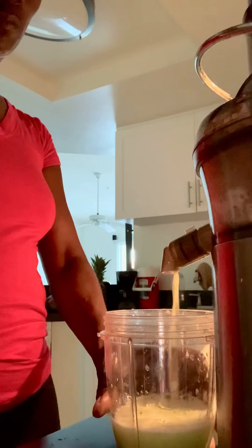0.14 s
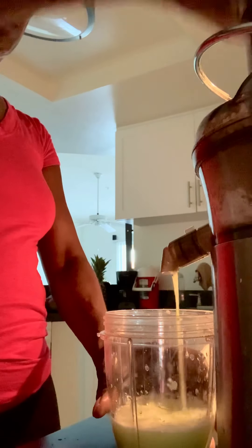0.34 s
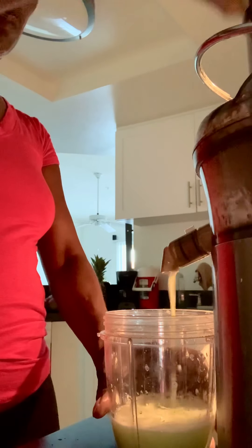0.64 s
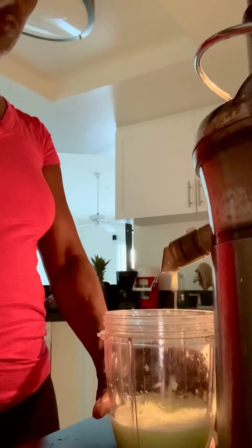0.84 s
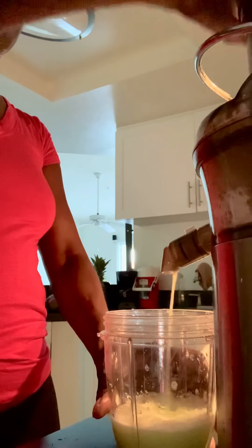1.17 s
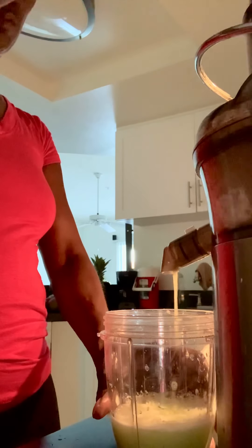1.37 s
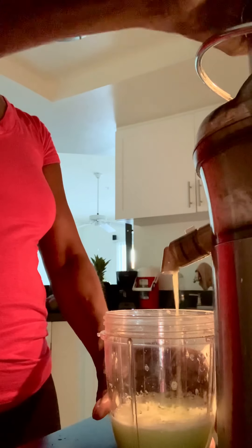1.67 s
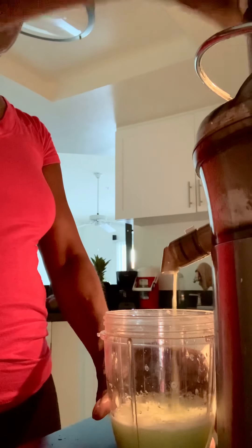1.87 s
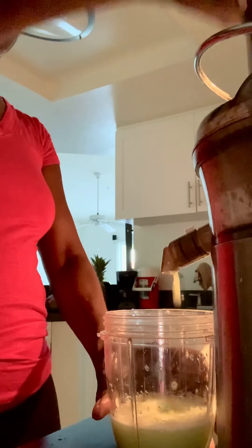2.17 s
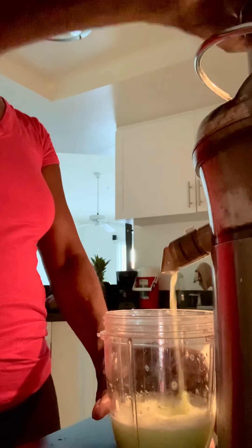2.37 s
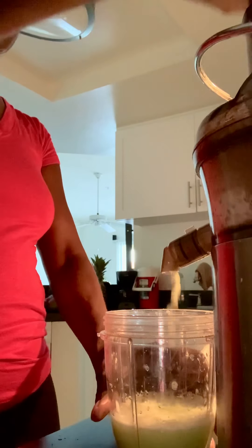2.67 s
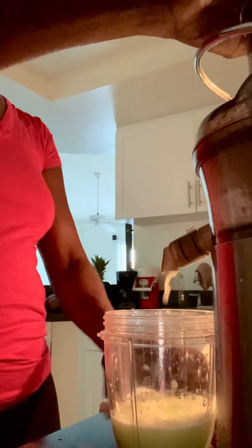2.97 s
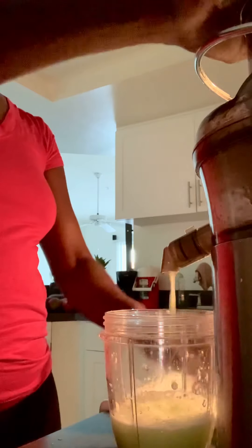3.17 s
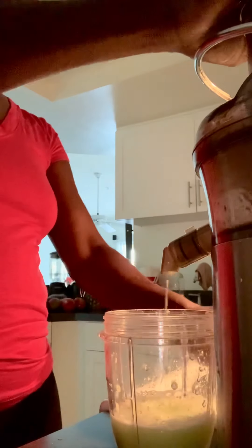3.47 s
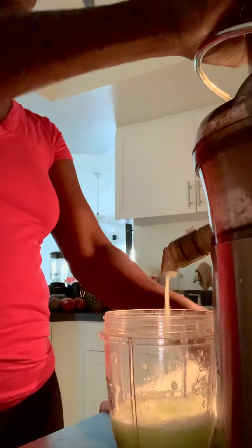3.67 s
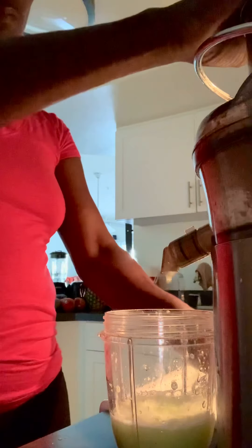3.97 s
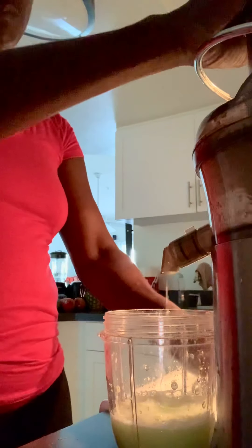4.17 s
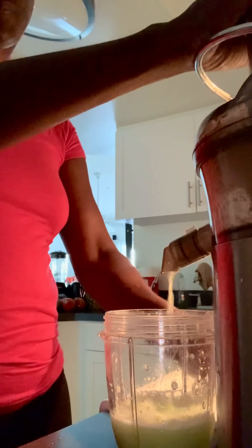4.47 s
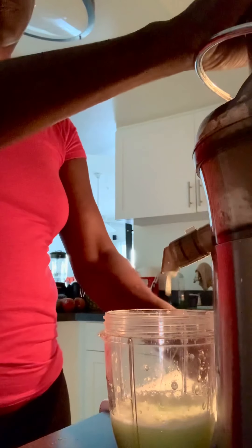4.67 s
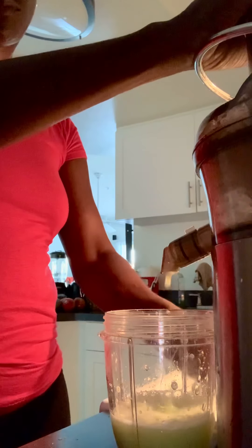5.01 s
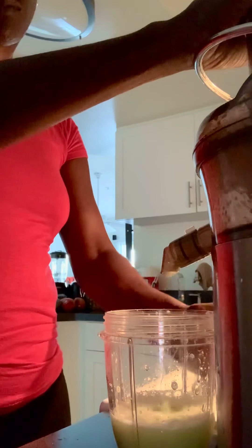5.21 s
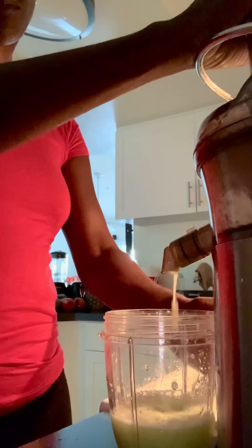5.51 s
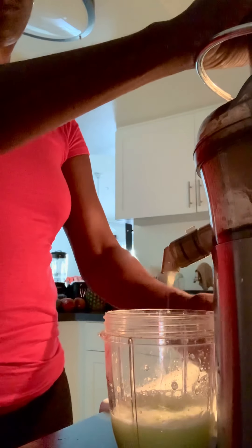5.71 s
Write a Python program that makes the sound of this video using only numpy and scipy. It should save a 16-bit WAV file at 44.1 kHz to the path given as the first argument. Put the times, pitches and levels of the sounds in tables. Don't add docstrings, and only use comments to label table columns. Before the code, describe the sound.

A centrifugal juicer fills the close stereo microphone with buzzing hum, hollow air roar and bright fluttering hiss. Five hard plastic clacks with dull base thuds come at near-regular intervals in the first three seconds, with a tiny wet spatter among them and short kitchen reflections. Steady running follows, the whine growing, until the power is cut and the motor starts coasting down, not yet stopped.

```python
import sys
import numpy as np
from scipy import signal
from scipy.fft import rfft, irfft
from scipy.io import wavfile
from scipy.ndimage import uniform_filter1d

SR = 44100
rng = np.random.default_rng(int(sys.argv[2]) if len(sys.argv) > 2 else 0)


def amplitude_ratio(level_db):
    exponent = np.asarray(level_db, float) / 20
    return 10 ** exponent


def store_wav(level_fs):
    pcm = np.round(np.clip(np.atleast_2d(level_fs), -1, 1) * 32767)
    wavfile.write(sys.argv[1], SR, pcm.T.astype(np.int16))


N = 257984
OFF_S = 5.345


def evened(x):
    return x / np.sqrt(np.mean(x ** 2) + 1e-20)


def read(points, hz):
    f, value = np.transpose(points)
    return np.interp(np.log(hz + 1), np.log(f + 1), value)


def curves(rows, t):
    s, *columns = np.transpose(rows)
    return [np.interp(t, s, c) for c in columns]


def peaks(modes, hz):
    power = 0
    for f, width, db in modes:
        power = power + amplitude_ratio(2 * db) / (1 + (2 * (hz - f) / width) ** 2) ** 2
    return np.sqrt(power)


def bump(t, s, length):
    return np.exp(-((t - s) / length) ** 2)


def bandpass(x, order, low_hz, high_hz):
    return signal.sosfilt(signal.butter(order, [low_hz, high_hz], "band", fs=SR, output="sos"), x)


def wander(rate_hz):
    return evened(signal.lfilter([1], [1, -np.exp(-2 * np.pi * rate_hz / SR)], rng.standard_normal(N)))


# time in seconds, shaft speed in Hz.
SPEED = [(0, 186.2), (.6, 186.8), (1.1, 186.9), (1.3, 186.6), (1.55, 186.7), (1.9, 187.2), (2.4, 187.6),
         (3.3, 188.2), (5.34, 188.85)]


def shaft_speed(t):
    coast = np.maximum(t - 5.34, 0)
    return curves(SPEED, t)[0] - 55.8 * coast + 11.6 * coast ** 2


TONES = [(0, 1), (0, 2), (0, 3), (0, -4), (1, -2), (1, -1), (1, 1), (1, -4), (2, 0), (3, 0), (3, 1),
         (3, -2), (4, 0), (5, 0), (6, 0), (7, 0), (10, 0), (12, 0), (14, 0), (24, 0), (28, 0), (35, 0),
         (46, 0)]
TONES_DB = [-7.5, -17.5, -19, -30, -17, -28, -17, -30, -14, -25, -21, -26, -23, -27, -21, -19, -16, -26,
            -33, -26, -29, -35, -34]
# shaft speed in Hz, level in dB.
MOUNT = [(163, -31), (167, -34), (171, -35), (176, -33.5), (183, -28.5), (188, -28.5)]


def motor_hum(t, speed, shaft):
    mains_hz = 59.98
    off = np.maximum(t - OFF_S, 0)
    hum = np.cos(shaft) * amplitude_ratio(1.4 * wander(11))
    for (turns, cycles), db in zip(TONES, TONES_DB):
        tone = np.cos(turns * shaft + 2 * np.pi * (cycles * mains_hz * t + rng.random()))
        fade_db = off * (200 if cycles else 28)
        drift_db = min(1.7 * turns, 3) * wander(19)
        hum += amplitude_ratio(db + drift_db - fade_db) * tone
    return amplitude_ratio(read(MOUNT, speed)) * hum


# time in seconds, emptiness from 0 to 1.
EMPTY = [(0, 0.4), (.7, 0.32), (1.2, 0.3), (1.65, 0.67), (2, 0.14), (2.35, .55), (2.8, 0.72), (3.3, 0.9),
         (3.75, 0.84), (4.4, 1), (5.85, 0.92)]
# whine pitch in Hz, level in dB.
SLOTS = [(5880, -4), (6000, -2), (6130, -6), (6320, -22), (6600, -1), (6790, 0.5)]


def commutator_whine(t, speed, shaft):
    whine_db = -52.5 + 12 * curves(EMPTY, t)[0] + read(SLOTS, 36 * speed)
    return 1.39 * np.cos(36 * shaft) * amplitude_ratio(whine_db + 1.2 * wander(8))


# shaft multiple, time in seconds, length in seconds, level in dB.
FLARES = [
    (48, 5.55, .05, -46),
    (49, 5.56, .04, -47),
    (60, 5.8, .06, -49),
    (61, 5.76, .04, -51),
]


def rundown_flares(t, shaft):
    return sum(amplitude_ratio(db) * bump(t, s, length) * np.cos(k * shaft) for k, s, length, db in FLARES)


def motor():
    t = np.arange(N) / SR
    speed = shaft_speed(t)
    shaft = 2 * np.pi * np.cumsum(speed) / SR
    tones = motor_hum(t, speed, shaft) + commutator_whine(t, speed, shaft) + rundown_flares(t, shaft)
    return np.sqrt(2) * tones, shaft


# frequency in Hz, likeness from 0 to 1.
SAME = [(60, .99), (250, .95), (600, .76), (1500, .8), (3000, .7), (4300, .8), (7000, .9), (15000, .84)]


def turbulence(hz, frames):
    a, b, c, d, patches = rng.standard_normal((frames, len(hz), 5)).T
    patches = uniform_filter1d(patches, size=16, axis=0)
    patches = evened(uniform_filter1d(patches, size=3, axis=1))
    same = np.clip(read(SAME, hz), -1, 1)[:, None]
    shared, own = a + 1j * b, c + 1j * d
    return np.array([shared, same * shared + np.sqrt(1 - same ** 2) * own]) * amplitude_ratio(1.4 * patches)


# frequency in Hz, width in Hz, level in dB.
BOWL = [(247, 30, 0), (310, 40, -9), (460, 75, -3), (630, 40, -8), (695, 30, -9), (785, 70, -4),
        (955, 80, 0)]
# frequency in Hz, width in Hz, level in dB.
CHUTE = [(1135, 60, 0), (1225, 60, -6), (1295, 70, -5), (1550, 110, -7), (1660, 70, -8)]
# frequency in Hz, width in Hz, level in dB.
LID = [(1815, 50, -2), (1866, 45, 0), (1950, 70, -11), (2110, 50, -17), (2250, 110, -16), (2410, 90, -16)]
# frequency in Hz, level in dB per Hz.
ROAR = [(30, -44), (60, -6.5), (150, -5.5), (400, -8), (1000, -4.5), (2000, -2.5), (2600, -7), (3200, -22),
        (5000, -16.5)]
# frequency in Hz, level in dB per Hz.
HISS = [(2500, -13), (3500, 4), (5200, 10.5), (7000, 2), (9000, -4.5), (11500, -14), (14000, -25.5),
        (16000, -33)]
# frequency in Hz, width in Hz, lift in dB.
VENTS = [(2900, 160, 21.5), (3900, 400, 2), (4980, 200, 10.5), (4850, 77, 5.5), (5920, 94, 8),
         (8800, 300, 5)]
# full-basket level in dB, gain once empty in dB, fade after off in dB/s.
LAYERS = [
    (-24, -2, 4),
    (-24, -.5, 4),
    (-26.5, 6.5, 13.5),
    (-40, 3.5, 1),
]


def air(shaft):
    size, hop = 2048, 512
    frames, hz = N // hop + 5, np.fft.rfftfreq(size, 1 / SR)
    t = np.arange(frames) * hop / SR
    z = turbulence(hz, frames)
    z *= amplitude_ratio(-np.outer(np.clip((330 - hz) / 200, 0, 1), np.clip(80 * (t - OFF_S), 0, 4)))

    empty, off = curves(EMPTY, t)[0], np.maximum(t - OFF_S, 0)
    rumble_db, chute_db, lid_db, hiss_db = (
        db + gain_db * empty - fade_db * off for db, gain_db, fade_db in LAYERS)
    for s, *_ in KNOCKS:
        lid_db = lid_db + 2.5 * (t > s) * np.exp(-abs(t - s) / 0.14)

    parts = [(peaks(BOWL, hz), rumble_db), (amplitude_ratio(read(ROAR, hz)), rumble_db + 1.5),
             (peaks(CHUTE, hz), chute_db), (peaks(LID, hz), lid_db)]
    power = sum((evened(shape)[:, None] * amplitude_ratio(db)) ** 2 for shape, db in parts)
    vents_db = sum(db / (1 + (2 * (hz - f) / width) ** 2) for f, width, db in VENTS)
    hiss_shape = evened(amplitude_ratio(read(HISS, hz) + vents_db - 60 * (hz < 1500)))
    hiss_level = hiss_shape[:, None] * amplitude_ratio(hiss_db + 7.5)

    body, hiss = (signal.istft(z * level / 54, nperseg=size, noverlap=size - hop)[1][:, :N]
                  for level in (np.sqrt(power), hiss_level))
    return body * amplitude_ratio(1.0 * wander(26)) + hiss * (1 + 0.18 * np.cos(shaft))


def ring(modes, t, rise):
    tune = 1 + 0.044 * rng.uniform(-0.8, 1, len(modes))
    total = 0
    for k, (hz, db, t60) in zip(tune, modes):
        total = total + amplitude_ratio(db - 60 * t / t60) * np.sin(2 * np.pi * hz * k * t)
    return (1 - np.exp(-(t / rise) ** 2)) * total


# frequency in Hz, level in dB, t60 in seconds.
SHELL = [(640, -11, 0.078), (782, 1, 0.018), (915, 4, 0.02), (1280, 4, 0.012), (1527, 6, 0.014),
         (1864, 3, 0.027), (2170, 0, 0.027), (2773, -1.5, 0.023), (3210, -5, 0.013), (3790, -6, 0.016)]


def shell_clack(t):
    rattle = rng.standard_normal(len(t)) * (rng.random(len(t)) < .04) * amplitude_ratio(-60 * t / .035)
    rattle[0] = 2
    return evened(signal.fftconvolve(rattle, ring(SHELL, t, .0003))[:len(t)])


def bending_wave(t):
    sweep = np.sin(2 * np.pi * np.cumsum(220 + 900 * np.exp(-t / .0042)) / SR)
    swell = (1 - np.exp(-t / .0008)) * (1 + 20 * np.minimum(t, .01))
    return sweep * swell * amplitude_ratio(-60 * np.maximum(t - .0105, 0) / .016)


def contact_crack(t):
    decay = amplitude_ratio(-60 * t / 0.026) + 0.098 * amplitude_ratio(-60 * t / 0.24)
    fizz = rng.standard_normal(len(t)) * (1 - np.exp(-t / 0.00037)) * decay
    return bandpass(fizz, 3, 4800, 10500)


# frequency in Hz, level in dB, t60 in seconds.
BASE = [(90, 1, 0.14), (166.8, 7, 0.056), (240, 19.5, 0.043), (453, -31, 0.033)]


def knock(blow_db, bend_db, hard_db):
    t = np.arange(6000) / SR
    clack = amplitude_ratio(-23.5 + hard_db) * shell_clack(t)
    crack = amplitude_ratio(-11 + .5 * hard_db) * contact_crack(t)
    thud = amplitude_ratio(-13) * ring(BASE, t, 0.014)
    return amplitude_ratio(bend_db) * bending_wave(t) + amplitude_ratio(blow_db) * (clack + crack + thud)


# time in seconds, length in seconds, level in dB, pitch in Hz.
SPLASHES = [
    (1.18, .035, -32, 9000),
    (1.21, .004, -21, 2600),
]


def splashes():
    t, spray = np.arange(N) / SR, rng.standard_normal(N)
    return sum(amplitude_ratio(db) * bump(t, s, length) * bandpass(spray, 2, .75 * hz, 1.3 * hz)
               for s, length, db, hz in SPLASHES)


def kitchen(x):
    t = np.arange(8000) / SR
    taps = rng.choice([-1., 1.], (2, 8000)) * (rng.random((2, 8000)) < .05)
    taps = bandpass(taps * amplitude_ratio(-60 * t / 0.12) * (t > .002), 1, 350, 6000)
    return signal.fftconvolve(x[None], taps / np.linalg.norm(taps[0]), axes=1)[:, :N]


# time in seconds, blow in dB, bending wave in dB, hardness in dB.
KNOCKS = [
    (0.27, 2, -13, -3),
    (0.877, 1.5, -21, 0.5),
    (1.525, 0.5, -19.5, 0),
    (2.134, 1.5, -15.5, 0.5),
    (2.687, -4, -11.5, 0),
]
# frequency in Hz, left minus right in dB.
LEAN = [(60, 0), (110, -.5), (200, -2.6), (380, -1.5), (700, -1.8), (1290, -1.5), (2380, 0), (15000, 0)]
# frequency in Hz, radians added to the right port's lead.
TURN = [(150, 0), (350, .3), (600, .9), (900, .6), (1300, 0)]


def scene():
    hand = splashes()
    for s, *touch in KNOCKS:
        at = round((s - .0006) * SR)
        hand[at:at + 6000] += knock(*touch)
    tones, shaft = motor()
    near = tones + air(shaft) + hand * amplitude_ratio([[-1], [1]]) + amplitude_ratio(-9.5) * kitchen(hand)

    hz = np.fft.rfftfreq(N, 1 / SR)
    balance = amplitude_ratio(np.array([[.5], [-.5]]) * read(LEAN, hz))
    lead = np.exp(1j * np.array([[0], [1]]) * read(TURN, hz))
    left, right = irfft(rfft(near) * balance * lead, N)
    lag = 5
    return np.array([np.append(np.zeros(lag), left[:-lag]), right])


def roll_off(x):
    return signal.sosfilt(signal.butter(12, 17090, fs=SR, output="sos"), x)


# low edge in Hz, high edge in Hz, level in dB.
STARVED_MID = [(4560, 5120, -14), (11900, 13750, -14), (14400, 15850, -4), (15850, 22050, -90)]
# low edge in Hz, high edge in Hz, level in dB.
STARVED_SIDE = [(7000, 7580, -4), (7580, 9600, -16), (15000, 15750, -10), (15750, 22050, -90)]


def record(dry):
    left, right = 1.05 * np.tanh(dry / 1.05)
    hz = np.fft.rfftfreq(N, 1 / SR)

    def thinned(x, bands):
        cut_db = sum(db * (hz > low) * (hz <= high) for low, high, db in bands)
        return irfft(rfft(x) * amplitude_ratio(cut_db), N)

    mid = thinned((left + right) / 2, STARVED_MID)
    side = thinned((left - right) / 2, STARVED_SIDE)
    return roll_off(np.array([mid + side, mid - side]))


dry = scene()
out = record(dry)
store_wav(out)
```